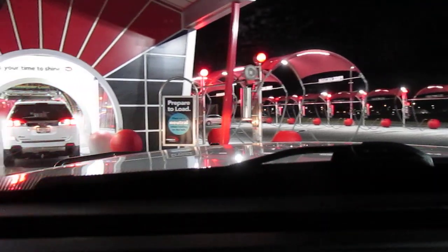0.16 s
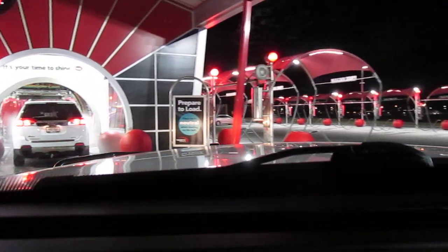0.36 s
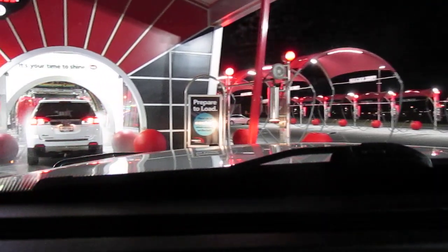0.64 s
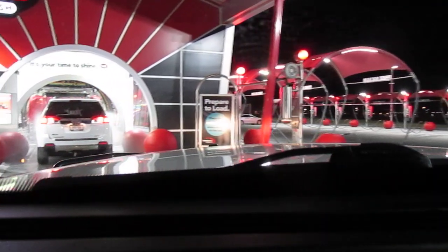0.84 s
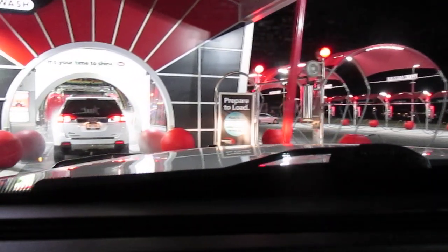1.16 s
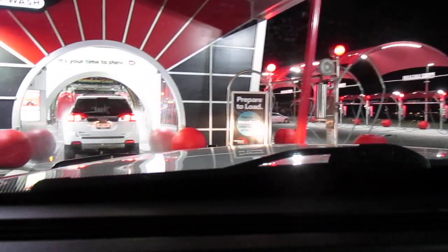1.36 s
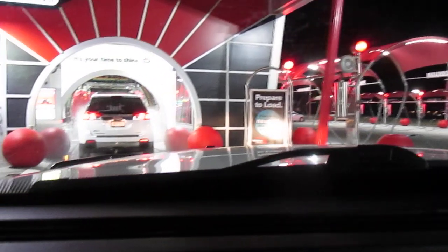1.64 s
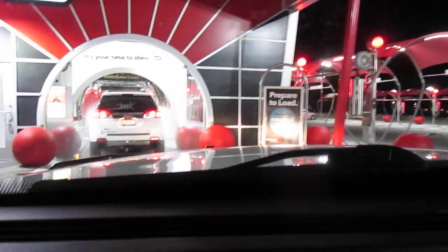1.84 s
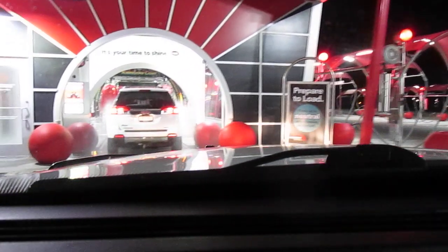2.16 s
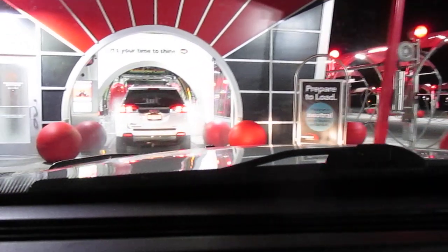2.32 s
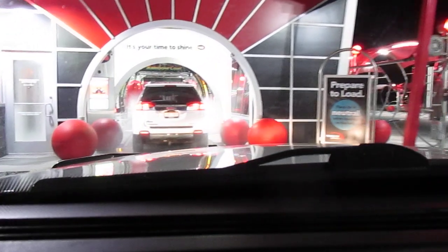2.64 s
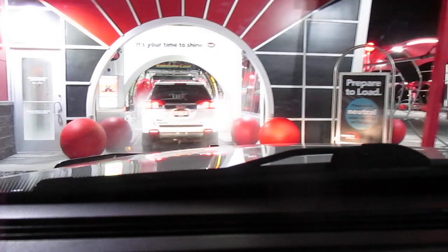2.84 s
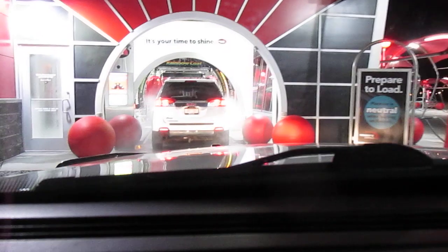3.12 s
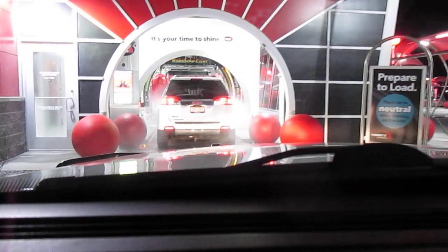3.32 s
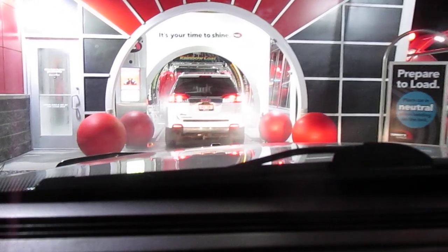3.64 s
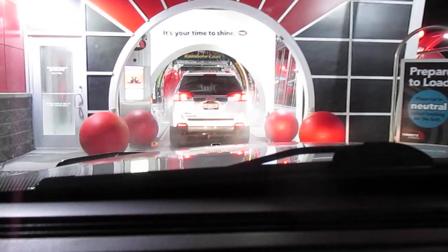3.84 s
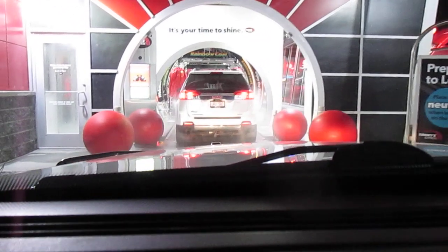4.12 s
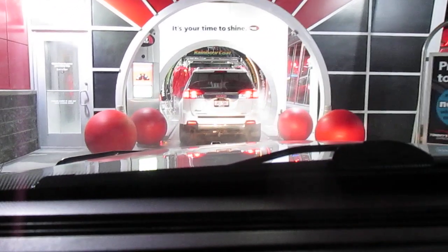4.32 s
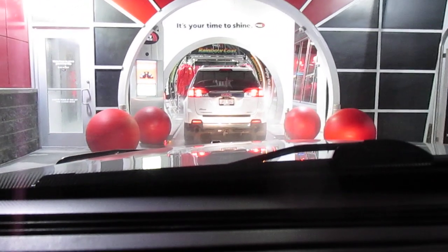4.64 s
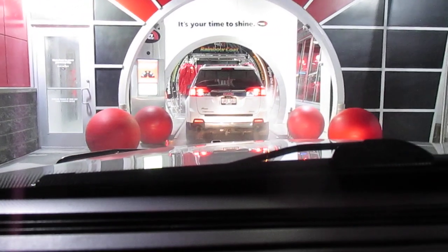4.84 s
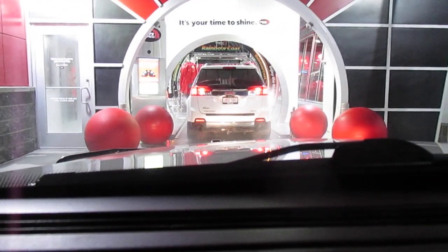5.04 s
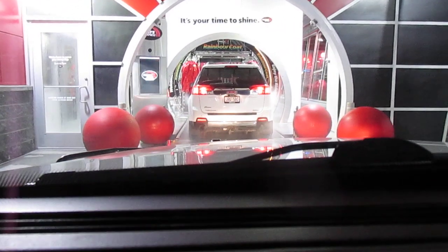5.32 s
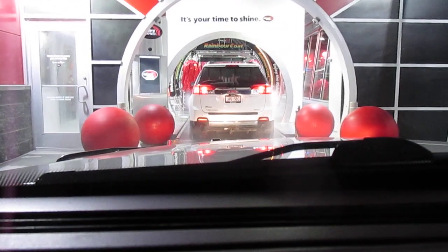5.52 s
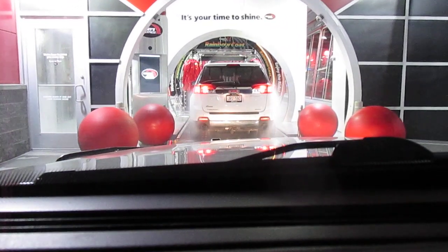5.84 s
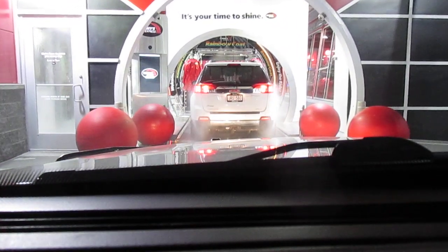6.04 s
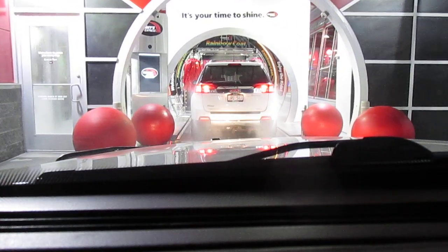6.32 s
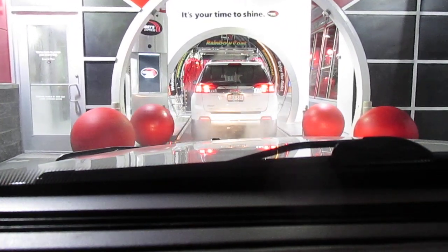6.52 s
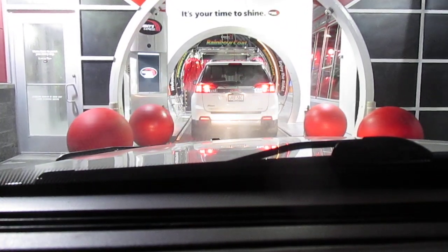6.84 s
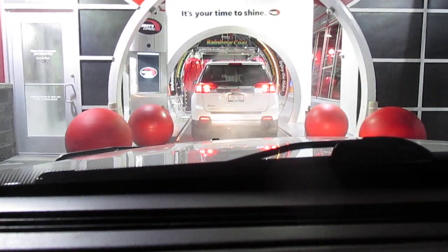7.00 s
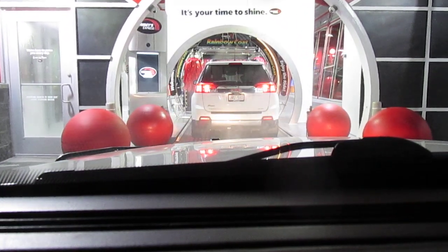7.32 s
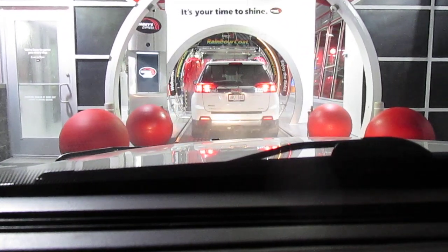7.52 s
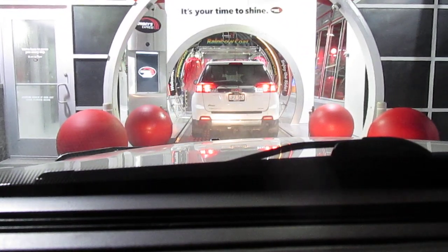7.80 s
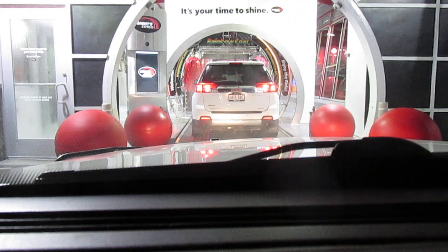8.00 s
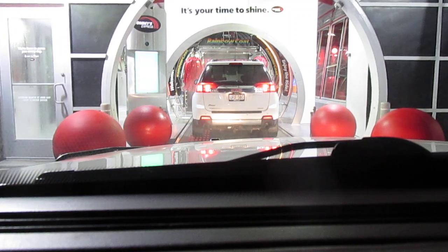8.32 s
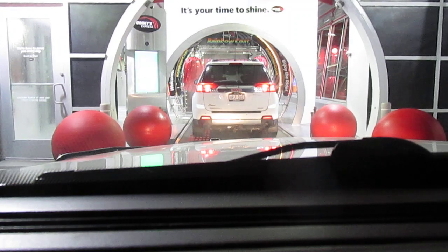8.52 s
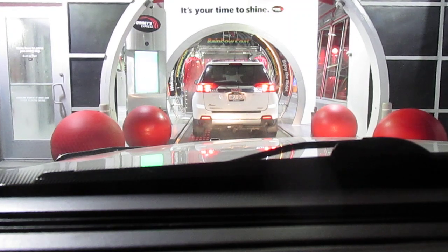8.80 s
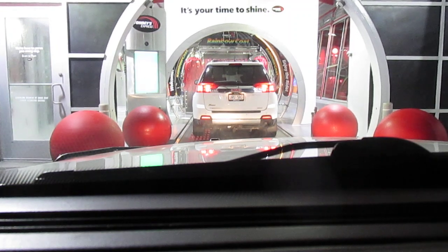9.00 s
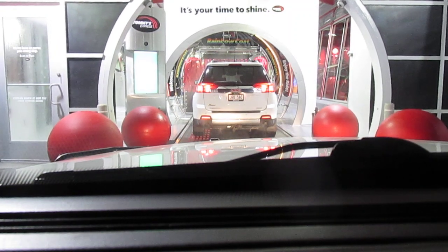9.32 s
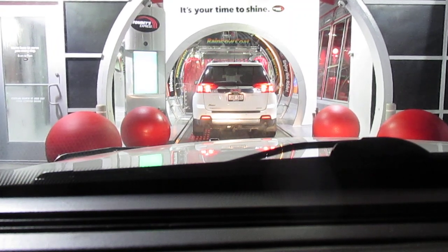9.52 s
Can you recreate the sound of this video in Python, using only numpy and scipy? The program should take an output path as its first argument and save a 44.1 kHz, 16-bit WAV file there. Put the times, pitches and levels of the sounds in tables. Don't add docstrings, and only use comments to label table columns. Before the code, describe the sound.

A car rolls slowly and comes to idle, heard from within its dry, upholstered interior. The bassy engine tone slides down and booms, then holds steady and low. Small crisp snaps from the wheel cover, short ringing rattles and dull thuds come irregularly. Hands rub the wheel in airy strokes, slightly left. Behind it, low rumble and muffled washing machinery rise gently toward the end.

```python
import sys
import numpy as np
from scipy import signal
from scipy.fft import rfft, irfft, next_fast_len
from scipy.io import wavfile
from scipy.ndimage import uniform_filter1d, map_coordinates

SR = 44100
rng = np.random.default_rng(int(sys.argv[2]) if len(sys.argv) > 2 else 0)


def invert_db(level):
    return 10 ** (np.asarray(level, dtype=float) / 20)


def wav_record(signal):
    frames = np.transpose(np.atleast_2d(signal))
    bounded = np.clip(frames, -1, 1)
    quanta = np.round(bounded * 32767).astype(np.int16)
    wavfile.write(sys.argv[1], SR, quanta)


N = 426006


def unit(x):
    return x / np.sqrt(np.mean(x ** 2) + 1e-20)


def along(points, f_hz):
    f, v = np.transpose(points)
    return np.interp(np.log(f_hz + 1), np.log(f + 1), v)


def curves(rows):
    t_s, *columns = np.transpose(rows)
    return [np.interp(np.arange(N) / SR, t_s, column) for column in columns]


def fine(x):
    return np.interp(np.arange(N) / SR, np.arange(len(x)) / 1000, x)


def wobble(rate_hz):
    steps = np.arange(0, N * rate_hz / SR + 1, 1 / 8)
    smooth = map_coordinates(rng.standard_normal(int(steps[-1]) + 4), [steps])
    return np.interp(np.arange(N) * rate_hz / SR, steps, smooth)


def swell(peak_s, rise_s, fall_s):
    t = np.arange(0, N / SR + .002, .001) - peak_s
    width_s = np.where(t < 0, max(rise_s, .01), max(fall_s, .01))
    return np.exp(-(t / width_s) ** 2)


def swells(rows, rest_db):
    power = sum((invert_db(db) * swell(*shape)) ** 2 for *shape, db in rows)
    return np.sqrt(invert_db(rest_db) ** 2 + fine(power))


def during(rows, fade_s):
    t = np.arange(N) / SR
    fade_in = np.clip((t - rows[0][0]) / fade_s + 1, 0, 1)
    fade_out = np.clip((rows[-1][0] - t) / fade_s + 1, 0, 1)
    return fade_in * fade_out


def filtered(x, response):
    m = next_fast_len(N + 8192)
    return irfft(rfft(x, m) * response(np.fft.rfftfreq(m, 1 / SR)), m)[..., :N]


def resonance(f, centre_hz, width_hz):
    damping = 1j * f * width_hz
    return damping / (centre_hz * centre_hz - f * f + damping)


def tone(f_hz, rough_db, rate_hz):
    phase = 2 * np.pi * (np.cumsum(f_hz) / SR + rng.random())
    return np.sqrt(2) * invert_db(rough_db * wobble(rate_hz)) * np.sin(phase)


def rush(spectrum, alike, patchy_db):
    z = signal.stft(rng.standard_normal((2, N)), nperseg=512)[2]
    field = uniform_filter1d(rng.standard_normal(z.shape[1:]), size=6, axis=0)
    field = uniform_filter1d(field, size=14, axis=1)
    pair = signal.istft(z * invert_db(patchy_db * unit(field)), nperseg=512)[1][:, :N]

    def mid_side(f):
        turn = np.arccos(np.clip(along(alike, f), -1, 1)) / 2
        return invert_db(along(spectrum, f)) * [np.cos(turn), np.sin(turn)]

    mid, side = filtered(pair, mid_side)
    return unit(np.array([mid + side, mid - side]))


def engine():
    # t/s, firing rate f/Hz, firing tone level/dB
    idling = [(0, 59.44, -17.5), (.42, 56.9, -23), (.63, 55.93, -26.5), (.94, 55.5, -18.5),
              (1.47, 54.1, -14.5), (1.65, 51.81, -14.5), (1.74, 49.26, -22.5), (1.9, 46.43, -22),
              (2.15, 38.24, -37), (2.34, 36.56, -25.5), (2.82, 39.93, -47), (3.1, 41.2, -28),
              (4.3, 40.72, -26.5), (4.85, 40.05, -31.5), (7.1, 40.97, -28), (8.3, 41.17, -27),
              (9.05, 40.53, -30.5), (9.66, 40.63, -25)]
    # multiple of firing rate, level/dB
    weak_orders = [(.5, -45), (4, -60), (5, -55)]
    # f/Hz, width/Hz, level/dB
    mount_modes = [(76.35, 7.9, -32), (119.7, 7.4, -40.5), (178.5, 10, -40), (246.7, 15.83, -43.5),
                   (304.4, 18, -35), (328, 30, -45.5)]
    order_loads = {2: [(4.5, .3, .3, 3), (7.8, .2, .25, 1.5), (9.1, 0.4, 0.13, 1.5)],
                   3: [(3.03, 0.21, 0.096, 6), (4.56, 0.16, 0.22, 10.5), (8.6, 0.55, 0.52, -4)],
                   6: [(1.75, 0.13, .08, 4), (2.2, .2, .3, -7), (4.05, .5, 0.46, 2.5), (4.75, 0.25, .3, -9),
                   (7.1, 0.18, 0.19, -8.5), (8.35, 0.16, .15, -4), (8.95, 0.4, 0.32, 4.5)]}
    # peak t/s, rise/s, fall/s, level/dB
    boom = [
        (1.84, .11, .06, -15.5),
        (2.02, .04, .04, -15.5),
        (2.14, .06, .6, -25),
    ]

    firing_hz, first_db = curves(idling)
    beat_s, beat_top_s, beat_end_s = .21, .201, .41
    beat = np.cos(np.pi * (np.minimum(np.arange(N) / SR, beat_end_s) - beat_top_s) / beat_s)
    pan = invert_db(along([(41, -1.4), (50, -0.14)], firing_hz) * [[1], [-1]])
    drone = invert_db(first_db) * beat * tone(firing_hz, 0.54, 3.9) * pan

    each_ms = np.arange(round(1000 * N / SR)) * SR // 1000
    slow_hz = firing_hz[np.minimum(each_ms, N - 1)]
    for k, loads in order_loads.items():
        power = sum(abs(invert_db(db) * resonance(k * slow_hz, hz, width)) ** 2 for hz, width, db in mount_modes)
        load_db = fine(sum(db * swell(*shape) for *shape, db in loads))
        drone += fine(np.sqrt(power)) * invert_db(load_db) * tone(k * firing_hz, 1.4, 5)
    for k, db in weak_orders:
        drone += invert_db(db) * tone(k * firing_hz, 1.6, 4)
    return drone + swells(boom, rest_db=-45) * tone(53.5 + .8 * wobble(4), 1, 6)


def road():
    rocking = [(.3, .6, .5, -34), (1.1, 0.34, .1, -27), (2.17, .12, 0.44, -29.5), (3.62, 0.42, 0.38, -38.5),
               (5.03, .2, 0.16, -51.5), (5.82, 0.28, 0.38, -36), (6.8, 0.41, .25, -44), (8.7, .3, .1, -38)]
    body = filtered(rng.standard_normal(N), lambda f: resonance(f, 30.5, 10.6) ** 2)
    return swells(rocking, rest_db=-48) * unit(body)


def whines():
    # t/s, f/Hz, level/dB
    mesh = [(0, 1820, -55), (.45, 1760, -62.5), (.6, 1750, -52.5), (.8, 1718, -53), (1, 1705, -54.5),
            (1.4, 1702, -53.5), (1.5, 1670, -59), (1.63, 1590, -55), (1.85, 1567, -60)]
    ratios = (1, 12 / 13, 11 / 13, 10 / 13, 9 / 13)
    sides_db = [-3, -4, -13, -10, -7]
    # peak t/s, rise/s, fall/s, level/dB, f/Hz
    passing_tones = [(.035, 0.017, 0.015, -29, 508), (.14, 0.09, 0.03, -37.5, 505),
                     (.45, 0.13, .15, -55.5, 1222), (.6, 0.72, 0.3, -40, 145.8),
                     (1.8, 0.1, 0.13, -40, 146.8), (5.97, 0.1, .5, -34.5, 65.3),
                     (7.2, 0.24, 0.35, -41, 477), (9.5, 0.18, 0.51, -39.5, 465)]
    # start t/s, f/Hz, level/dB
    steady_tones = [(2.2, 727.5, -58), (3.5, 682, -67), (3.5, 745, -73)]

    mesh_hz, mesh_db = curves(mesh)
    gears = sum(invert_db(db) * tone(k * mesh_hz, 0.82, 8.0) for k, db in zip(ratios, sides_db))
    out = during(mesh, fade_s=0.061) * invert_db(mesh_db) * gears

    def wavering_tone(hz, waver):
        return tone(hz * (1 + waver * wobble(30)), 1.5, 14)

    for *shape, db, hz in passing_tones:
        out += invert_db(db) * fine(swell(*shape)) * wavering_tone(hz, waver=.006)
    for start_s, hz, db in steady_tones:
        out += invert_db(db) * (np.arange(N) > start_s * SR) * wavering_tone(hz, waver=.002)
    return out


def sliding():
    # fastest t/s, rise/s, fall/s, level/dB
    strokes = [(1.46, .13, 0.16, -57.5), (1.97, 0.44, 0.32, -56.5), (2.5, .3, 0.27, -56),
               (2.82, 0.23, 0.22, -50), (4.1, 0.37, .3, -61), (4.46, 0.17, .12, -56),
               (4.68, 0.083, .06, -56.5), (4.82, 0.043, 0.082, -56), (5.19, 0.31, 0.25, -46),
               (5.66, 0.24, .1, -60), (6.3, .4, .25, -65), (8.48, .1, .08, -65), (9.2, 0.15, .06, -57)]
    # t/s, level/dB
    resting = [(0, -65.5), (6, -63), (7.5, -68), (9.66, -65.5)]
    return 20 * np.log10(swells(strokes, rest_db=curves(resting)[0]))


def hands():
    # f/Hz, density level/dB
    skin = [(1940, -43), (3300, 0.5), (3480, 0), (3760, -2), (4250, 0), (5030, 3), (5540, -2), (6020, 3.5),
            (6680, 2), (7700, -2), (8660, 0.5), (10700, -8.5), (12400, -5.5), (15500, -8.5)]
    slide_db = sliding()
    slips = invert_db(0.68 * wobble(25) + wobble(400))
    hiss = unit(slips * rush(skin, [(3500, 0.88), (6000, 0.1), (15000, 0.15)], patchy_db=-1.2))
    bright = filtered(hiss, lambda f: abs(resonance(f, 12500, 4100)) ** 2)
    hiss += invert_db(0.79 * (slide_db + 48.5) + 1.5) * bright
    return invert_db(slide_db + 1.7) * hiss * invert_db([[1.4], [-1.4]])


def ticks():
    # t/s, peak level/dB, left-right/dB, brightness/dB
    snaps = [(0.019, -44, 5, -15), (.242, -46, 2, -8), (0.258, -37, 8, -10), (.374, -40.5, 4, -4),
             (0.787, -30.5, -1, -10), (0.793, -35, 1, -10), (.9479, -37, 5, -2), (1.071, -36, 3, -4),
             (1.2164, -32, 3, -24), (1.3011, -43, 3, -15), (1.353, -37.5, 5, -6), (1.4085, -35.5, 2, -18),
             (1.4501, -41, 4, -18), (4.812, -39, 1, -20), (1.734, -42.5, 1.5, -6), (4.351, -43, 2.5, -16),
             (4.37, -43, 2.5, -19), (4.3913, -41, 3, -14), (4.4149, -51, -8, -15), (4.4903, -38, 3, -12),
             (4.5096, -43, 4, -13), (4.5552, -36.5, 7, -7), (4.794, -39, 6, -22), (4.9013, -40, 0, -11),
             (5.673, -46.5, 0, -12), (5.745, -44.5, 2, -2), (8.406, -48, 3, -15), (8.7037, -46, 4, -9.5),
             (4.572, -40, 3, -20), (1.338, -47, -7, -6)]
    dull, bright = np.zeros((2, 2, N + SR))
    t = np.arange(SR // 10) / SR
    fall = invert_db(-60 * t / 0.03) + 2.7 * invert_db(-60 * t / 0.002)
    for s, db, pan_db, bright_db in snaps:
        shared, left, right = rng.standard_normal((3, len(t)))
        pan = invert_db([[pan_db / 2], [-pan_db / 2]])
        burst = invert_db(db) * fall * pan * (0.53 * shared + 0.96 * np.array([left, right]))
        span = slice(round(s * SR), round(s * SR) + len(t))
        dull[:, span] += burst
        bright[:, span] += invert_db(bright_db + 0.5) * burst
    low = filtered(dull[:, :N], lambda f: resonance(f, 6360, 7500) ** 3)
    return low + filtered(bright[:, :N], lambda f: resonance(f, 10300, 10000) ** 2)


def rattle():
    # t/s, peak level/dB, f/Hz
    strikes = [(1.927, -31, 826), (1.964, -30, 832), (2.021, -31.5, 830), (2.412, -35.5, 822),
               (3.229, -30.5, 822), (3.482, -33.5, 828), (4.601, -35, 764), (4.603, -41, 1224),
               (5.426, -35.5, 827), (5.673, -50, 2709)]
    out = np.zeros(N + SR)
    t = np.arange(SR // 6) / SR
    for s, db, hz in strikes:
        envelope = invert_db(db + 7 - 60 * t / .06) * (1 - np.exp(-t / .008))
        out[round(s * SR):][:len(t)] += envelope * np.sin(2 * np.pi * hz * t)
    return out[:N]


def panels(f):
    # f/Hz, width/Hz, level/dB
    modes = [(148, 18, 2), (335, 40, -8), (515, 45, -8)]
    return sum((-1) ** k * invert_db(db) * resonance(f, hz, width) for k, (hz, width, db) in enumerate(modes))


def knocks():
    # t/s, puff level/dB, thud level/dB, puff t60/s
    blows = [(0.014, -51, -28, 0.13), (1.263, -64, -19, .06), (1.669, -37.5, -48.5, 0.06),
             (1.715, -57, -22, .06), (4.599, -42, -22, 0.064), (9.051, -56, -33, .06)]
    puff, push = np.zeros((2, N + SR))
    t = np.arange(SR // 6) / SR
    for s, db, thud_db, t60_s in blows:
        envelope = invert_db(db - 60 * t / t60_s) * (1 - np.exp(-t / 0.0032))
        puff[round(s * SR):][:len(t)] += envelope * rng.standard_normal(len(t))
        push[round(s * SR)] = invert_db(thud_db + 48.5)

    def cushioned(f):
        return (panels(f) + invert_db(-14) * resonance(f, 230, 90)) / (1 + 1j * f / 450) ** 2

    puffs = invert_db(15) * filtered(puff[:N], lambda f: resonance(f, 1250, 1500) ** 2)
    return puffs + filtered(push[:N], cushioned)


def roar():
    # t/s, floor shake level/dB, tunnel level/dB
    levels = [(0, -31.5, -41.5), (.6, -36, -43.5), (1.65, -37, -43), (2.4, -37, -46.5), (3, -37.5, -44.5),
              (3.8, -39.5, -45.5), (4.65, -36.5, -44.5), (6.3, -38, -46), (7.15, -37, -44),
              (7.53, -36, -41.5), (8.37, -35.5, -42), (9.66, -35, -40.5)]
    # f/Hz, density level/dB
    rumble_spectrum = [(12, -35), (20, -1), (38, -5), (59, -1.5), (125, -12), (195, -13), (247, -11.5),
                       (291, -14), (386, -17), (483, -21), (552, -29), (631, -26), (700, -49), (910, -62.5),
                       (1540, -120)]
    tunnel_spectrum = [(240, -31), (400, -4.5), (482, -1), (552, -9), (623, -11.5), (740, -8.5), (774, -6),
                       (976, -13), (1080, -15), (1400, -16.5), (1490, -19), (1650, -15), (2070, -27),
                       (2260, -30), (2400, -30), (3120, -62), (5280, -120)]
    spray_spectrum = [(1120, -7.5), (1900, -7), (2130, -3.5), (2430, 0), (2770, 1.5), (3130, -5),
                      (4610, -11.5), (6060, -10.5), (6910, -14.5), (8990, -18), (9900, -25.5),
                      (13600, -19.5), (15500, -33)]
    # f/Hz, left-right likeness
    alike = [(60, 1), (130, 0.97), (290, 1), (640, 0.91), (1300, 0.21), (1700, 0.058), (2200, 0.068),
             (2700, 0.4), (4000, 0.071), (15000, 0.065)]

    rumble_db, tunnel_db = curves(levels)
    spray_db = -58.5 + 0.48 * (tunnel_db - tunnel_db.mean())
    sleeve_db = sliding() - 12.5
    spray = np.hypot(invert_db(spray_db), invert_db(sleeve_db))
    shake = wobble(7)
    floor = filtered(rush(rumble_spectrum, alike, patchy_db=0.8), lambda f: 1 + 0.8 * abs(panels(f)))
    out = invert_db(rumble_db + 4.5 + 1.26 * shake) * unit(floor)
    out += invert_db(tunnel_db + 1.5 + 0.41 * shake) * rush(tunnel_spectrum, alike, patchy_db=0.4)
    return out + spray * invert_db(2.0 + 0.2 * wobble(6.2)) * rush(spray_spectrum, alike, patchy_db=0.3)


def cabin(x):
    # f/Hz, t60/s
    decay = [(200, 0.051), (3000, 0.054), (14000, 0.03)]
    f, t, z = signal.stft(rng.standard_normal((2, SR // 5)), SR, nperseg=256)
    fall = invert_db(-60 * t / along(decay, f)[:, None])
    tail = signal.istft(z * fall, SR, nperseg=256)[1]
    return signal.fftconvolve(x, tail / np.linalg.norm(tail[0]), axes=1)[:, :N]


def scene():
    near = ticks() + rattle() + knocks()
    return engine() + road() + whines() + hands() + near + roar() + invert_db(-11) * cabin(near)


def top_cut(x):
    return signal.sosfilt(signal.butter(12, 15960, fs=SR, output="sos"), x)


def record(dry):
    # f/Hz, left-right/dB
    lean = [(60, -1.5), (180, -1.5), (550, -1), (1650, -2), (4970, -0.5), (15000, 0)]
    # f/Hz, left port's phase lead/rad
    lead = [(30, 0.4), (55, .5), (85, 0.29), (300, 0.44), (900, 0.54), (2500, 0), (3500, 2), (5000, 3.5),
            (7500, 3.5), (10000, 4.5), (12500, 7.5), (15500, 5.5)]
    # f/Hz, width/Hz, depth 0-1
    notch = (7885, 70, .85)
    notch_hz, width_hz, depth = notch
    sides = np.array([[.5], [-.5]])

    def microphone(f):
        ports = invert_db(sides * along(lean, f)) * np.exp(1j * sides * along(lead, f))
        return ports * (1 - depth * resonance(f, notch_hz, width_hz)) * (f < 15760)

    return top_cut(filtered(dry, microphone))


dry = scene()
out = record(dry)
wav_record(out)
```